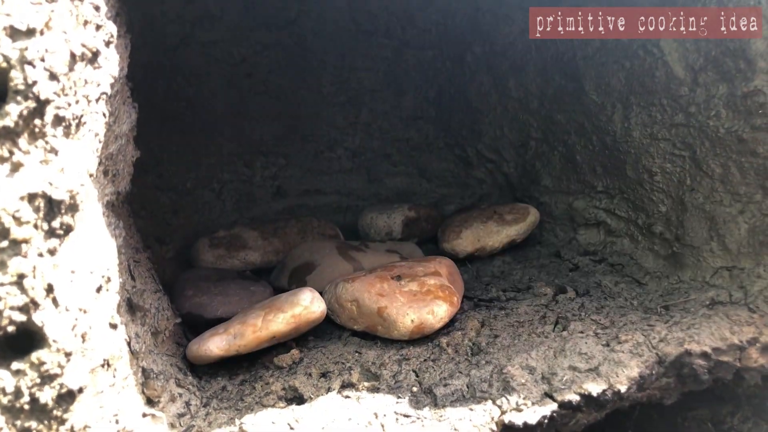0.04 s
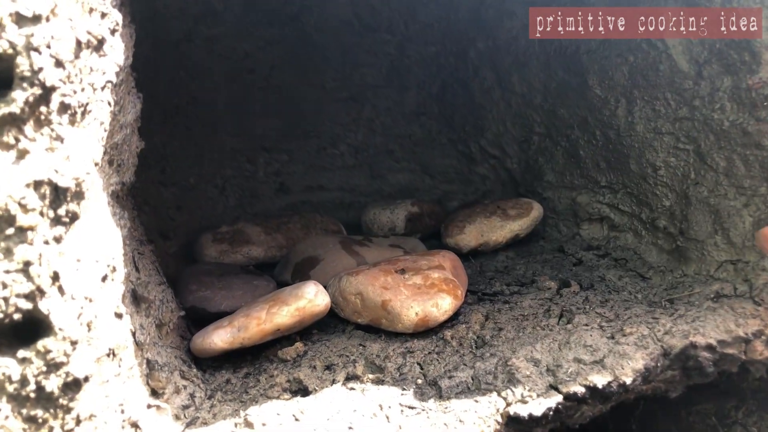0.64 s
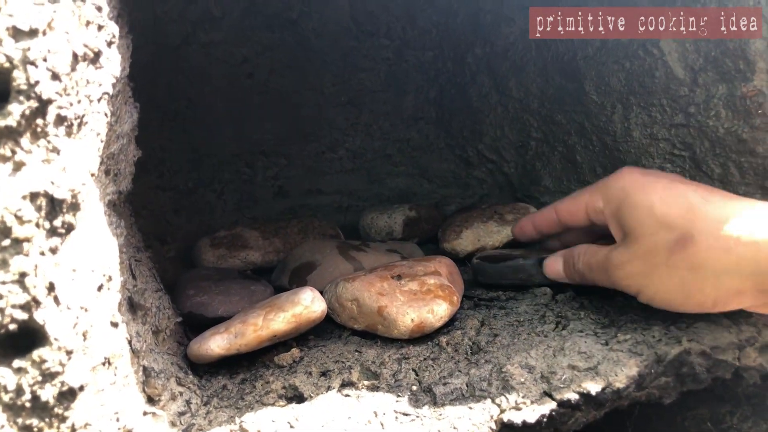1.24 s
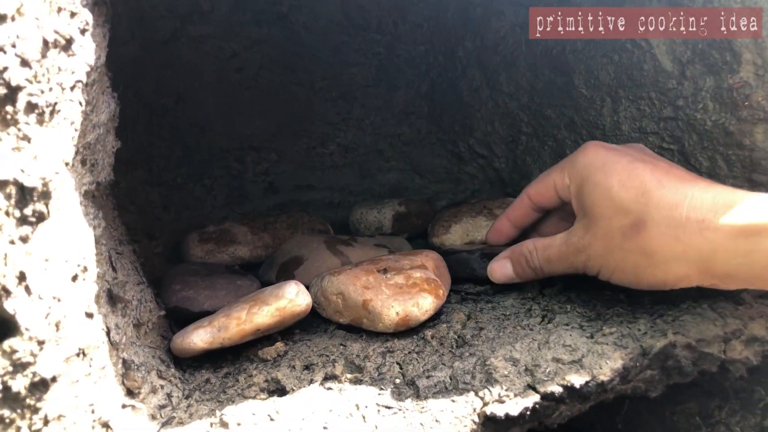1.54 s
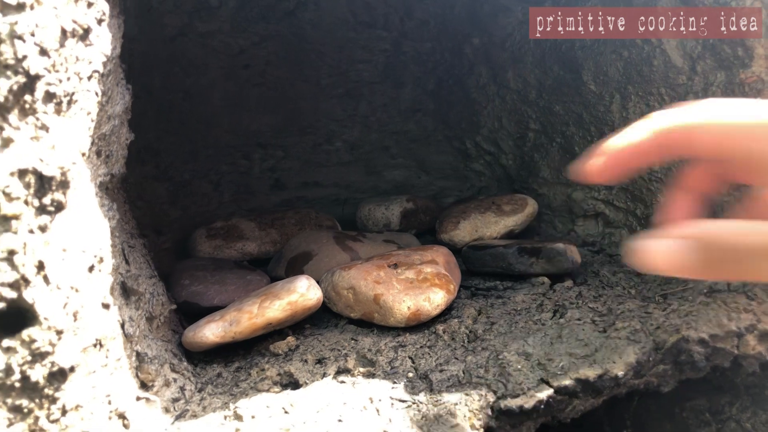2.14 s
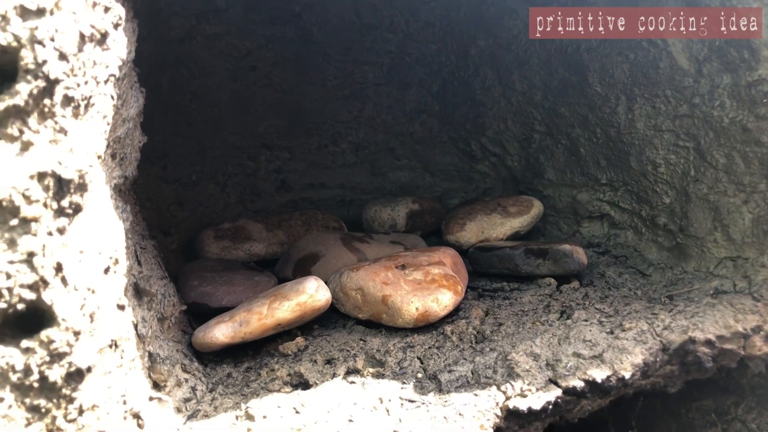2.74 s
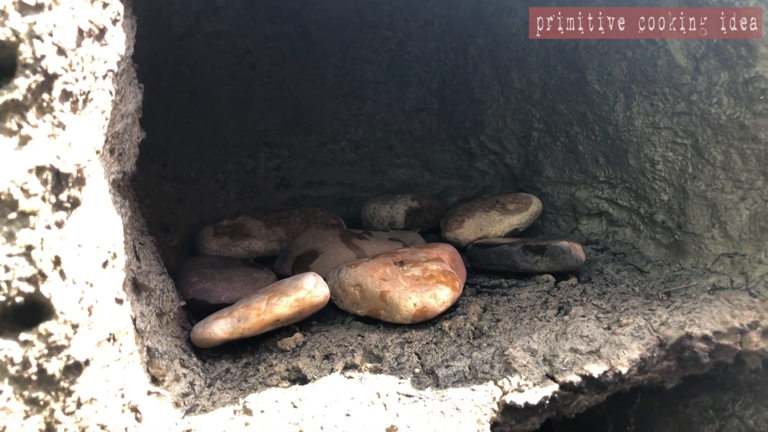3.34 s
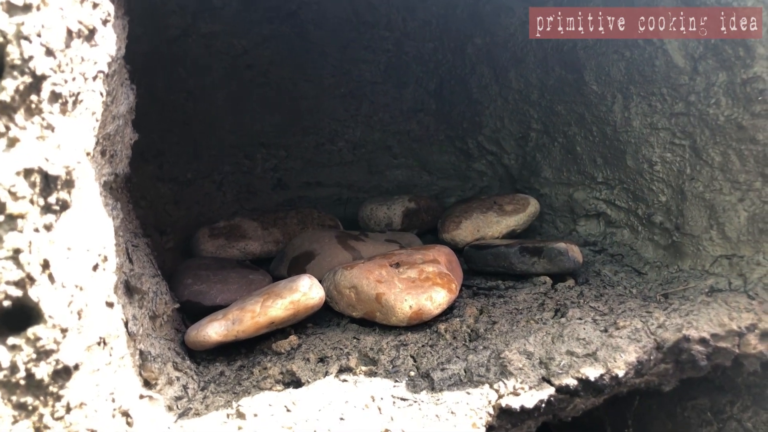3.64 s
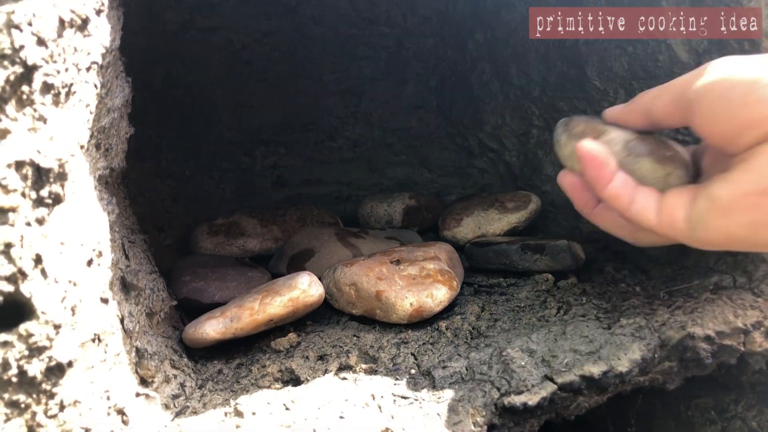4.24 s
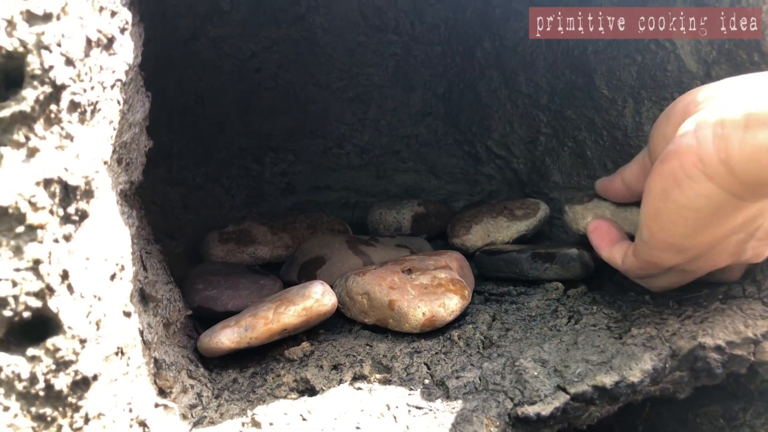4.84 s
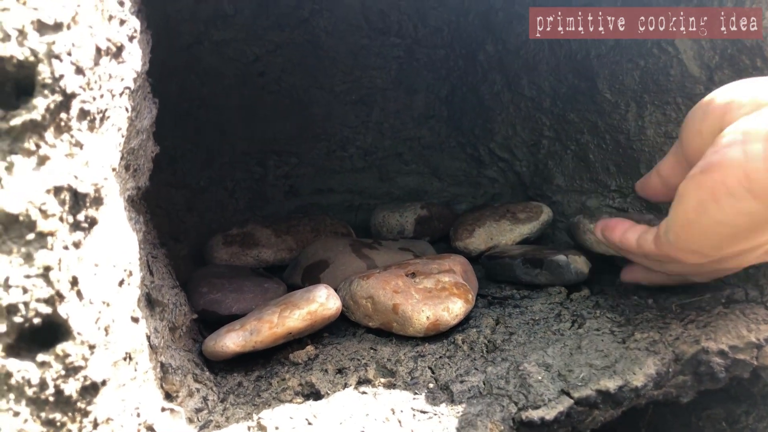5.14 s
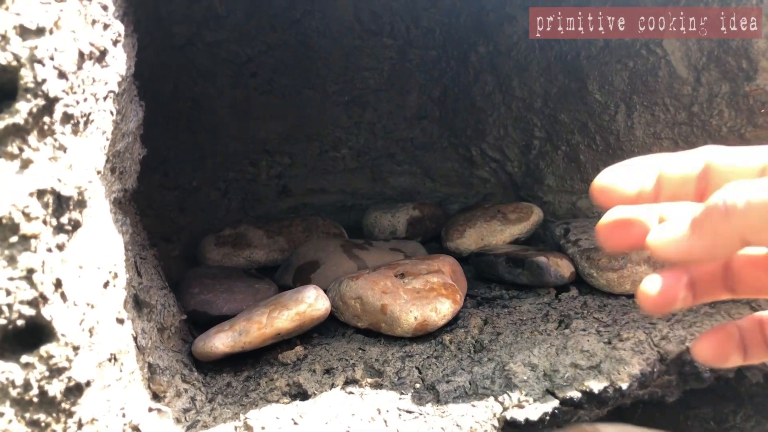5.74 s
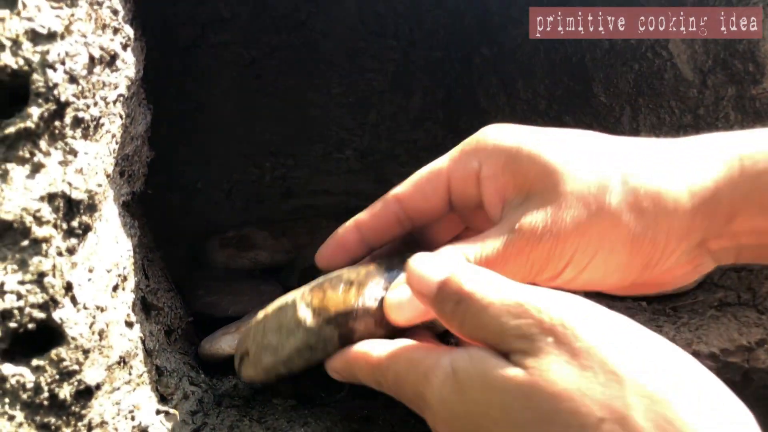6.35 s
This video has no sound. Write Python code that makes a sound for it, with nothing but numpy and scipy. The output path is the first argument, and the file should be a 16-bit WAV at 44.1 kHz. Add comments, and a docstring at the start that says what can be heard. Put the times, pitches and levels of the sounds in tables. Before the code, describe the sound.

Outdoors in quiet air, a distant rooster crows faintly while an insect shrills and a small bird whistles upward now and then. Close to the microphone, a flat stone thuds onto the ashy floor of a clay stove, scrapes along and clacks several times against other stones. A pause follows, then a round stone is put in with one sharp knock and rattles lightly into place.

```python
"""Quiet outdoor air, a far insect shrilling, a faint rooster crow, a small bird whistling upward.
Up close, two smooth stones are set by hand into the ashy chamber of an earthen stove. A flat one
thuds down, slides over grit and clacks against its neighbours; then a round one knocks, rocks and
settles. Each clack rings the stone and the chamber, each thud booms in the hollow clay floor,
and the slides are swarms of tiny cracking grains."""
import sys
import numpy as np
from scipy import signal
from scipy.fft import rfft, irfft, next_fast_len
from scipy.io import wavfile

SR = 44100
rng = np.random.default_rng(int(sys.argv[2]) if len(sys.argv) > 2 else 0)


def wav_record(signal):
    """Record a signal, one row per channel, as 16-bit PCM in the file named by sys.argv[1]."""
    frames = np.transpose(np.atleast_2d(signal))
    bounded = np.clip(frames, -1, 1)
    # unit amplitude maps onto the largest positive 16-bit level
    quanta = np.round(bounded * 32767).astype(np.int16)
    wavfile.write(sys.argv[1], SR, quanta)


N = 281786
TIME = np.arange(N) / SR

# The tone of the outdoor air. Each row: frequency in Hz, relative level in dB.
AIR_SPECTRUM = [(20, -60), (38, -11), (56, 0), (125, -1), (200, -5), (300, -8.5), (450, -12.5),
                (900, -17.5), (2200, -21.5), (5000, -24), (6500, -24), (10000, -27), (16000, -33.5)]
# The slow swell of a faint hiss. Each row: time in seconds, level in dB.
HISS_SWELL = [(0, -77), (2.6, -76.5), (6.3, -66.5)]
# The insect's resonances. Each row: frequency in Hz, width in Hz, relative level in dB.
INSECT_BANDS = [(7500, 67, -19.5), (7550, 47, -10.5), (7953, 330, -5)]
# The shape of the crow. Each row: time in seconds, pitch in Hz, relative level in dB.
CROW_CONTOUR = [(.18, 332, -90), (0.33, 334.3, -77.5), (.58, 331, -70.5), (.68, 322.5, -61.5),
                (.79, 312.4, -65.5), (.865, 325, -63), (.92, 318, -78)]
# The crow's partials. Each row: multiple of the pitch, relative dB while hoarse, then once clear.
CROW_VOICE = [(2.53, -1, -11), (2.781, 1.5, -11), (3, -4, 2), (3.93, -2, -10), (5.09, -1, -12),
              (6.021, -3, -11)]

# A stone brushes the clay. Each row: start and length in seconds, grit and floor rumble in dB.
CLAY_SCRAPES = [(0.489, 0.024, -55.5, -78), (0.86, 0.013, -53.5, -59), (1.01, 0.058, -60, -61),
                (1.621, 0.023, -57, -61), (1.733, 0.014, -61.5, -60), (2.935, 0.025, -69, -85),
                (3.03, 0.12, -67.5, -78), (3.717, .06, -66, -86), (4.1, 0.36, -69, -95),
                (4.727, 0.0072, -57.5, -90), (4.77, 0.016, -59.5, -87), (4.979, 0.021, -60, -81),
                (5.013, .11, -62, -57), (5.275, 0.044, -61.5, -54.5), (5.472, 0.047, -58.5, -54)]
# Stone rubs on stone. Each row: start and length in seconds, level in dB.
STONE_RUBS = [(1.086, 0.0073, -47.5), (1.571, 0.04, -56), (1.805, 0.059, -54), (1.904, 0.069, -53.5),
              (2.029, 0.027, -57.5), (2.112, 0.11, -65.5), (3.267, 0.2, -70.5), (4.143, 0.28, -68.5),
              (4.494, 0.032, -55), (4.549, 0.095, -59), (4.805, .12, -66), (5.436, 0.087, -58),
              (5.55, 0.14, -60.5), (5.825, 0.032, -63.5)]
# Two shoves push the flat stone home, one curve each. Each row: time in seconds, pressure in dB.
SHOVE_CURVES = [
    [(1.295, -75), (1.307, -59), (1.325, -50), (1.333, -58.5), (1.386, -55.5), (1.393, -47.5),
     (1.436, -48.5), (1.445, -54), (1.508, -61.5), (1.517, -52), (1.535, -68)],
    [(1.725, -82), (1.747, -62.5), (1.845, -58.5), (1.911, -69.5), (1.971, -65.5), (1.977, -73),
     (2.033, -69), (2.043, -62.5), (2.075, -84)],
]
# The tone of crunching grit and of rubbing stone. Each row: frequency in Hz, relative level in dB.
GRIT_SPECTRUM = [(400, -4.5), (1200, -18), (2300, -9), (3000, -1), (4200, 0), (5700, -5), (6700, -5),
                 (9000, -6.5), (12000, -9), (16000, -15.5)]
RUB_SPECTRUM = [(400, -12), (900, -11), (1300, -2.5), (1700, -3.5), (2500, -8.5), (3300, -19.5),
                (5000, -25), (10000, -54)]
# The bird's whistles. Each row: start and length in seconds.
BIRD_CALLS = [(0.675, 0.31), (2.475, 0.15), (2.691, 0.2), (3.28, 0.31), (4.03, 0.21), (5.101, 0.33),
              (6.019, .19), (6.22, 0.18)]

# Stone meets stone. Each row: start in seconds, strength in dB, pitch of the knock in Hz,
# seconds to the first rebound (0 for a stone held fast).
STONE_HITS = [(0.8676, -38, 2490, 0.0014), (0.891, -40, 1560, 0.003), (0.967, -45, 2500, 0),
              (1.0346, -33.5, 1460, 0.0039), (1.611, -17.5, 2680, 0.0006), (1.7838, -21.5, 1940, 0.00068),
              (1.801, -18.5, 2390, 0.00038), (1.8103, -22.5, 2400, 0.005), (1.849, -24, 2100, 0.00038),
              (2.037, -38.5, 1590, 0), (3.055, -44.5, 1926, 0.0057), (3.356, -45, 1140, 0),
              (4.31, -34.5, 890, 0.0046), (4.4866, -33, 1650, 0), (4.589, -41.5, 1640, 0.006),
              (4.9673, -46, 1650, 0), (5.0029, -12, 2800, 0.0017), (5.277, -30, 2170, 0.0054),
              (5.2936, -33, 2210, 0.0017), (5.453, -33, 1820, 0.00036), (5.489, -32.5, 2525, 0.0029),
              (5.6127, -33.5, 1730, 0), (5.626, -38, 2380, 0.0016), (5.6544, -34, 1620, 0.0018),
              (5.728, -33, 1520, 0.001), (5.839, -40.5, 1550, 0.016), (5.939, -44, 1518, 0),
              (6.116, -40.5, 1810, 0.0027)]
# First echoes off the chamber walls. Each row: typical delay in seconds, relative level in dB.
WALL_TAPS = [(.0023, 1.5), (.0044, 3)]
# A stone's weight lands. Each row: start in seconds, floor boom peak in dB, crushed grit in dB.
LANDINGS = [(1.0889, -21, -42.5), (1.1033, -37, -43), (1.164, -39.5, -52.5), (1.329, -44.5, -55),
            (1.397, -49, -53.5), (1.44, -43, -51), (1.754, -46, -51), (5.0064, -33.5, -53),
            (5.07, -40, -47.5)]
# What rings when struck. Each row: frequency in Hz, relative level in dB, seconds to fall 60 dB.
FLAT_STONE_MODES = [(2410, -10, 0.029), (3210, -3, 0.015), (4600, -10, 0.015), (11800, 3, 0.027)]
ROUND_STONE_MODES = [(1525, -8.5, 0.036), (2020, 0, 0.027), (2410, -3, 0.022), (3980, 4, 0.016),
                     (4698, 4, 0.011), (6010, 0, 0.014), (11900, 10, 0.02)]
FLAT_BED_MODES = [(497, -28.5, 0.024), (903, -19.5, 0.03)]   # each stone's clunk on its bed
ROUND_BED_MODES = [(538, -28, 0.028)]
CHAMBER_MODES = [(1326, -19, 0.045), (1647, -6, 0.044), (1862, -17, 0.066), (2330, -12, 0.018),
                 (2502, -8.5, 0.033), (2770, -6.5, 0.014)]   # the air inside the stove
FLOOR_MODES = [(231, -4.5, 0.07), (309, 4, 0.07), (525, -11, 0.025), (701, -16.5, 0.13)]   # the hollow clay floor
STOVE_MODES = [(76.7, -2.5, 0.25), (111.6, 0, 0.33), (146, 10.5, 0.067)]   # the heavy earthen body


def from_db(db):
    """Decibels as a gain."""
    return 10 ** (np.asarray(db) / 20)


def rms_one(x):
    """Bring a signal to an rms of 1."""
    return x / np.sqrt(np.mean(x ** 2) + 1e-20)


def filtered(x, order, hz, kind):
    """A Butterworth low, high or band pass."""
    return signal.sosfilt(signal.butter(order, hz, kind, fs=SR, output="sos"), x)


def colour(x, spectrum):
    """EQ a steady signal with a spectrum curve; rms 1."""
    hz, db = np.transpose(spectrum)
    size = next_fast_len(N)
    bins = np.maximum(np.fft.rfftfreq(size, 1 / SR), 1)
    gain = from_db(np.interp(np.log(bins), np.log(hz), db))
    return rms_one(irfft(rfft(x, size) * gain, size)[:N])


def narrow_noise(width_hz, count=N):
    """A wandering complex amplitude: it smears a tone into a band of that width."""
    size = next_fast_len(count)
    spread = np.exp(-2 * (np.fft.fftfreq(size, 1 / SR) / width_hz) ** 2)
    wander = np.fft.ifft(spread * (rng.standard_normal(size) + 1j * rng.standard_normal(size)))[:count]
    return wander / np.std(wander)


def ringing(modes, t):
    """Decaying sines of a struck body."""
    return sum(from_db(db - 60 * t / t60) * np.sin(2 * np.pi * hz * t) for hz, db, t60 in modes)


def add(out, start, sound):
    """Mix a sound in at a start time in seconds."""
    i = int(start * SR)
    out[i:i + len(sound)] += sound[:N - i]


def outdoors(air_db=-61.5, hiss_hz=(1000, 4500)):
    """A bed of low steady air under a soft, slowly swelling hiss."""
    air = from_db(air_db) * colour(rng.standard_normal(N), AIR_SPECTRUM)
    hiss = rms_one(filtered(rng.standard_normal(N), 1, hiss_hz, "band"))
    return air + from_db(np.interp(TIME, *np.transpose(HISS_SWELL))) * hiss


def insect(level_db=-71, waver_db=2.5, waver_hz=9):
    """A wavering shrill from a few narrow resonances."""
    shrill = sum(from_db(db) * np.real(narrow_noise(width) * np.exp(2j * np.pi * hz * TIME))
                 for hz, width, db in INSECT_BANDS)
    waver = from_db(waver_db * np.real(narrow_noise(waver_hz)))
    return from_db(level_db) * rms_one(shrill * waver)


def rooster(gain_db=2.5, smear_hz=24, rasp_hz=200, clears_s=(0.56, 0.68)):
    """One long far note: hoarse with clashing partials, then swelling into a clear falling tone."""
    times, hz, db = np.transpose(CROW_CONTOUR)
    t = TIME[int(times[0] * SR):int(times[-1] * SR)]
    phase = 2 * np.pi * np.cumsum(np.interp(t, times, hz)) / SR
    out, note = np.zeros(N), 0
    for multiple, hoarse_db, clear_db in CROW_VOICE:
        waver = 1 + 0.3 * narrow_noise(smear_hz, len(t)) + 0.47 * narrow_noise(rasp_hz, len(t))
        gain = from_db(np.interp(t, clears_s, [hoarse_db, clear_db]))
        note += gain * np.real(waver * np.exp(1j * multiple * phase))
    add(out, times[0], from_db(gain_db + np.interp(t, times, db)) * rms_one(note))
    return out


def grains(per_s, spread_db):
    """Random clicks of very uneven size."""
    sizes = from_db(spread_db * np.minimum(rng.exponential(1, N), 4))
    return (rng.random(N) < per_s / SR) * sizes * rng.choice([-1, 1], N)


def scattered(clicks, blur_db, t60):
    """Each grain cracks at another spot, so each leaves its own short blur of wall echoes."""
    fade = from_db(-60 * TIME[:SR // 20] / t60) ** 2
    power = signal.fftconvolve(clicks ** 2, fade / fade.sum())[:N]
    return clicks + from_db(blur_db) * np.sqrt(np.maximum(power, 0)) * rng.standard_normal(N)


def grit_pops(gain_db=-8, t60=0.0091, band_hz=(2500, 9000)):
    """Now and then a crushed grain goes off as a tiny bright burst."""
    decay = from_db(-60 * TIME[:SR // 30] / t60)
    envelope = signal.fftconvolve(np.abs(grains(per_s=70, spread_db=3.5)), decay)[:N]
    return from_db(gain_db) * rms_one(filtered(envelope * rng.standard_normal(N), 1, band_hz, "band"))


def stroke(length, db, attack_share=0.11, release_s=0.013):
    """One stroke of the hand: pressure builds, holds, and dies away as the crumbs settle."""
    t = TIME[:int((length + 10 * release_s) * SR)]
    attack = np.minimum(t / (attack_share * length), 1)
    return from_db(db) * attack * np.exp(-np.maximum(t - length, 0) / release_s)


def pressures(shove_grit_db=(0.5, 6.5), crush_lead_s=0.0039, ash_in_rub_db=-12, rub_in_scrape_db=-8):
    """Envelopes for how hard the stones bear on grit, on one another and on the floor."""
    on_grit, on_stone, on_floor = np.zeros((3, N))
    for curve, grit_db in zip(SHOVE_CURVES, shove_grit_db):
        pressure_db = np.interp(TIME, *np.transpose(curve), left=-np.inf, right=-np.inf)
        on_grit += from_db(grit_db + pressure_db)
        on_floor += from_db(-32.5 + 0.52 * pressure_db)   # rumble grows more gently than grit
    for start, length, grit_db, rumble_db in CLAY_SCRAPES:
        add(on_grit, start, stroke(length, grit_db))
        add(on_floor, start, stroke(length, rumble_db))
    # the grit gives way in a quick crunch just before the weight lands
    t = TIME[:SR // 10]
    crush = np.minimum(t / 0.0014, 1) * np.exp(-(t / 0.0052) ** 2 / 2)
    for start, _, grit_db in LANDINGS:
        add(on_grit, start - crush_lead_s, from_db(grit_db) * crush)
    for start, length, db in STONE_RUBS:
        add(on_stone, start, stroke(length, db))
    # rubbing also catches some ash; scraping also rubs the stone
    return (np.hypot(on_grit, from_db(ash_in_rub_db) * on_stone),
            np.hypot(on_stone, from_db(rub_in_scrape_db) * on_grit), on_floor)


def slides(judder_db=2.5, judder_hz=110, pressed_ring=0.64):
    """Under a moving stone grit cracks in clumps, rough faces stick and slip, and the floor rumbles."""
    judder = from_db(judder_db * np.real(narrow_noise(judder_hz)))
    # grains of different sizes crack in different bands
    edges_hz = np.geomspace(500, 16000, num=8)
    cracks = sum(filtered(grains(per_s=800, spread_db=2.5), 1, band, "band")
                 for band in zip(edges_hz, edges_hz[1:]))
    grit = colour(scattered(cracks * judder, blur_db=-5, t60=0.012), GRIT_SPECTRUM) + grit_pops()
    slips = grains(per_s=1500, spread_db=3.5)
    rub = colour(scattered(slips, blur_db=0, t60=0.017), RUB_SPECTRUM)
    # the floor rings shorter under the sliding stone
    floor = ringing([(hz, db, t60 * pressed_ring) for hz, db, t60 in FLOOR_MODES], TIME[:SR // 10])
    jolts = np.diff(grains(per_s=2800, spread_db=2), prepend=0)
    rumble = rms_one(signal.fftconvolve(jolts, floor)[:N])
    on_grit, on_stone, on_floor = pressures()
    return on_grit * grit + on_stone * rub + on_floor * rumble


def bird(gain_db=-72, start_hz=4710, smear_hz=700, swell_db_per_s=15, trail_db=-3, trail_t60=0.38):
    """Whistles that swell as they climb ever faster; distance blurs them and leaves a trail."""
    out, blur = np.zeros(N), narrow_noise(smear_hz)
    for start, length in BIRD_CALLS:
        t = TIME[:int(length * SR)]
        phase = 2 * np.pi * np.cumsum(start_hz + 2300 * t + 10000 * t ** 2) / SR
        whistle = np.real(np.roll(blur, -int(start * SR))[:len(t)] * np.exp(1j * phase))
        envelope = signal.windows.tukey(len(t), 0.5) * from_db(-2 + swell_db_per_s * t)
        add(out, start, rms_one(whistle) * envelope)
    t = TIME[:SR // 2]
    tail = rng.standard_normal(len(t)) * from_db(-60 * t / trail_t60)
    trail = signal.fftconvolve(out, tail / np.linalg.norm(tail))[:N]
    return from_db(gain_db) * (out + from_db(trail_db) * trail)


def touches(count=4, loss_db=5.5, gap_shrink=0.6):
    """Every hit with its rebounds: a loose stone rattles, each bounce weaker and sooner."""
    for start, db, hz, gap in STONE_HITS:
        for bounce in range(count if gap > 0 else 1):
            yield start, db - bounce * loss_db, hz
            start += gap * gap_shrink ** bounce


def wall_echoes(t, predelay_s=0.002, early_t60=0.014, late_db=-34.5, late_t60=0.31):
    """Close walls return a dense burst of echoes; a weak tail lingers behind it."""
    fade = from_db(-60 * t / early_t60) + from_db(late_db - 60 * t / late_t60)
    return rng.standard_normal(len(t)) * fade * (t > predelay_s)


def at_random_spot(modes, vary_db):
    """Every spot in the stove wakes its modes a little differently."""
    return [(hz, db + rng.normal(0, vary_db), t60) for hz, db, t60 in modes]


def clacks(round_from_s=3.5, firm_db=-18.5, stone_db=-16, chamber_db=-18, crack_db=-36,
           contact_s=0.00037):
    """Each contact is one brief push: it rings the stone and bounces round the chamber."""
    out, t = np.zeros(N), TIME[:SR // 8]
    for start, db, hz in touches():
        stone = FLAT_STONE_MODES if start < round_from_s else ROUND_STONE_MODES
        bed = FLAT_BED_MODES if start < round_from_s else ROUND_BED_MODES
        force_db = 0.45 * (db - firm_db)   # only a hard blow really wakes the stone itself
        response = wall_echoes(t) + from_db(stone_db + force_db) * ringing(stone, t)
        response += from_db(chamber_db) * ringing(at_random_spot(CHAMBER_MODES, vary_db=1.5), t)
        # the pocket of air between stones and fingers gives each knock its hollow pitch
        response += ringing([(hz, -20, 0.022)], t)
        response[0] += 1   # the direct click
        for delay, echo_db in WALL_TAPS:
            response[int(abs(delay * rng.normal(1, 0.1)) * SR)] += from_db(echo_db)
        # a harder blow means a shorter contact, which reaches higher; a faint crack lies on top
        top_hz = min(hz * 1.197 * from_db(0.2 * max(db + 24.5, 0)), SR / 3)
        knock = filtered(response, 3, top_hz, "low")
        crack = from_db(crack_db + force_db) * response
        clack = filtered(knock + crack, 2, hz / 1.18, "high")
        strength = np.sqrt(np.sum(clack ** 2) / (contact_s * SR))
        add(out, start + 0.001, from_db(db) * (clack / strength + ringing(bed, t)))
    return out


def thuds(contact_s=0.0016, low_cut_hz=190, body_lag_s=0.01374, body_db=-27.5, body_follows=0.59):
    """Ash cushions the landing, so only the floor's low modes answer; the heavy stove body follows."""
    out, t = np.zeros(N), TIME[:SR // 3]
    push = np.sin(np.pi * np.minimum(TIME[:SR // 100] / contact_s, 1)) ** 2
    body = ringing(STOVE_MODES, t) * (1 - np.exp(-t / 0.005))
    for start, db, _ in LANDINGS:
        floor = ringing(at_random_spot(FLOOR_MODES, vary_db=2), t)
        boom = filtered(signal.fftconvolve(floor, push)[:len(t)], 2, low_cut_hz, "high")
        add(out, start, from_db(db) * boom / np.max(np.abs(boom)))
        add(out, start + body_lag_s, from_db(body_db + body_follows * db) * body)
    return out


def scene():
    """Stones in the stove up front, the quiet outdoors behind, in mono."""
    stones = clacks() + thuds() + slides()
    return (stones + outdoors() + insect() + bird() + rooster())[None]


def record(dry, cutoff_hz=15900):
    """A steep low pass takes off the very top."""
    return signal.sosfilt(signal.ellip(10, 0.2, 70, cutoff_hz, fs=SR, output="sos"), dry)


dry = scene()
out = record(dry)
wav_record(out)
```